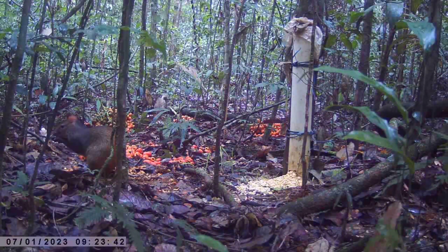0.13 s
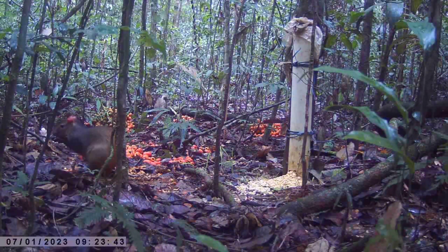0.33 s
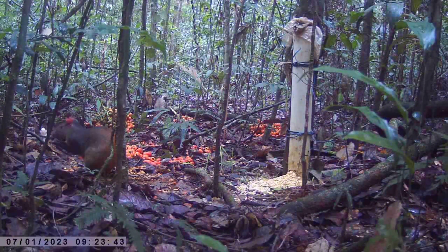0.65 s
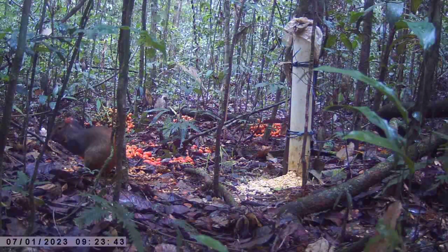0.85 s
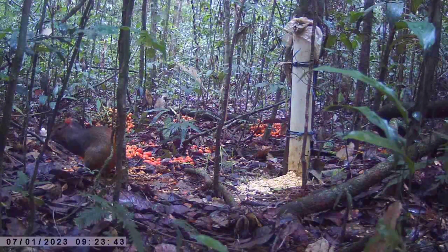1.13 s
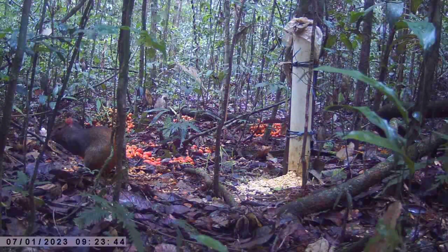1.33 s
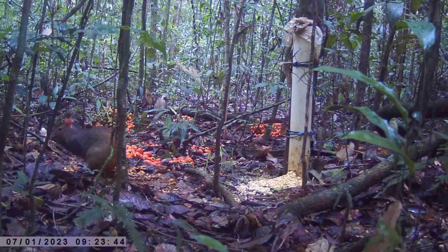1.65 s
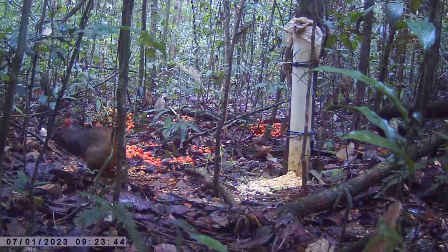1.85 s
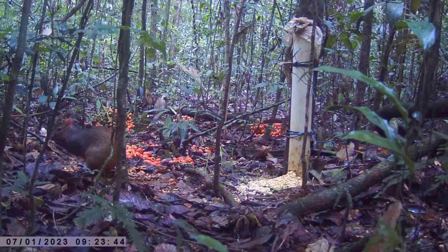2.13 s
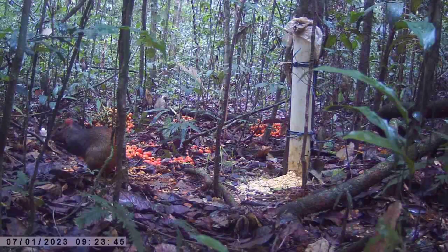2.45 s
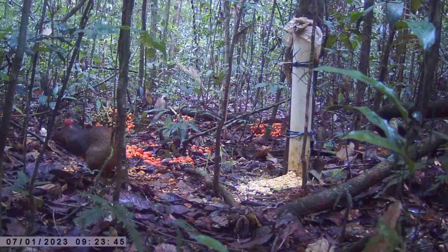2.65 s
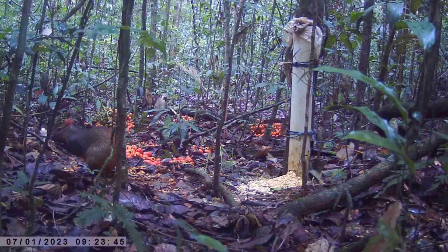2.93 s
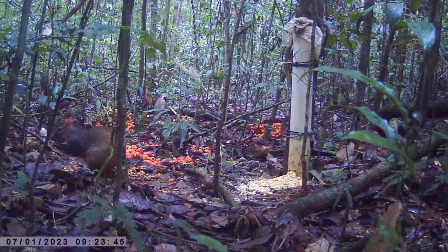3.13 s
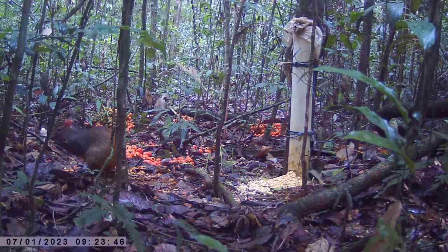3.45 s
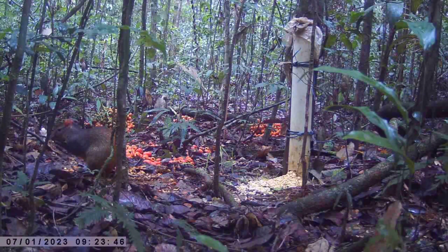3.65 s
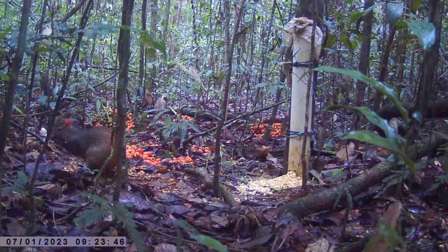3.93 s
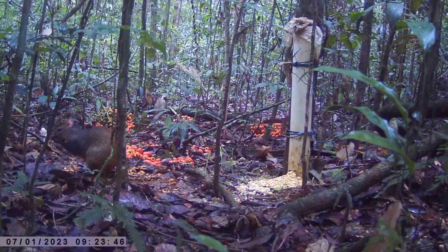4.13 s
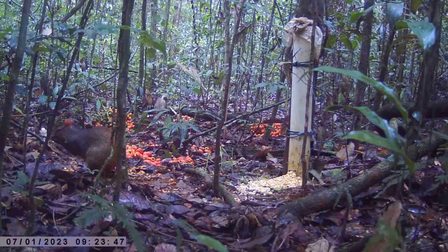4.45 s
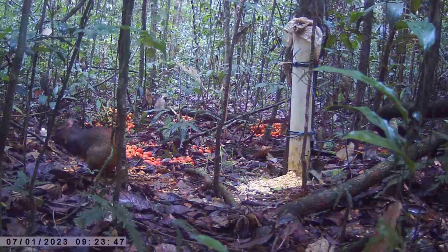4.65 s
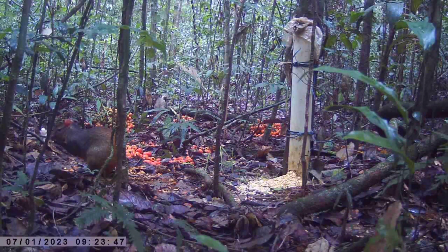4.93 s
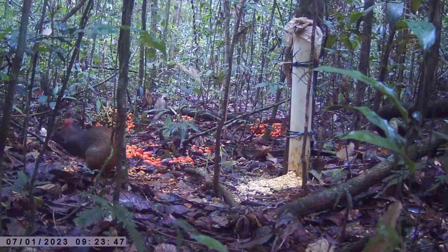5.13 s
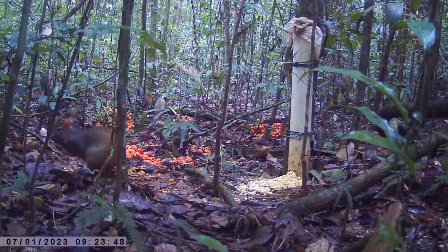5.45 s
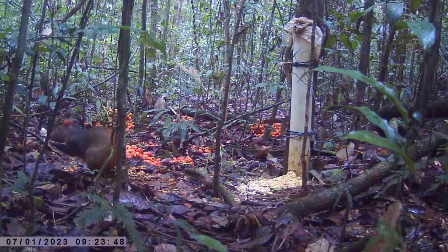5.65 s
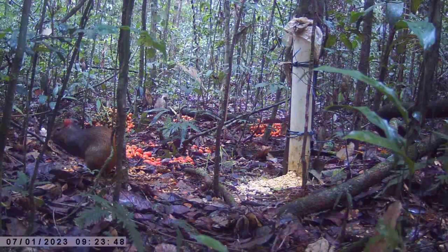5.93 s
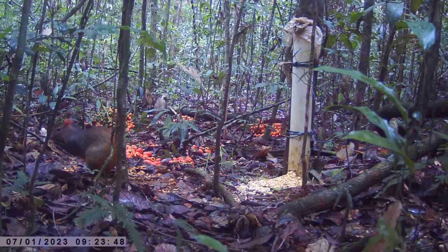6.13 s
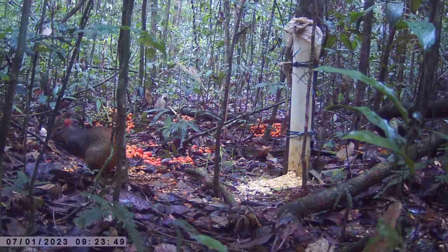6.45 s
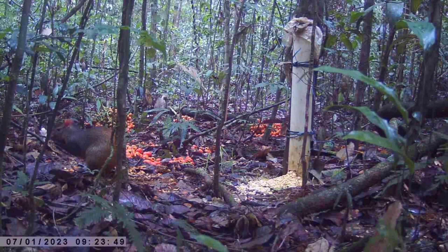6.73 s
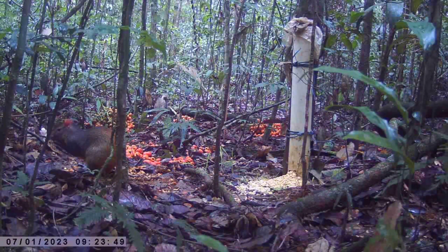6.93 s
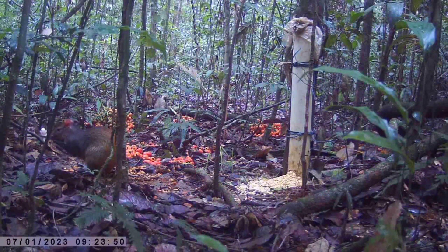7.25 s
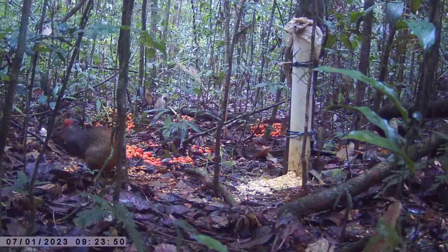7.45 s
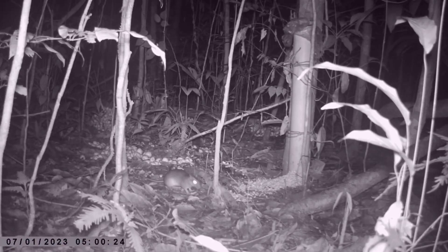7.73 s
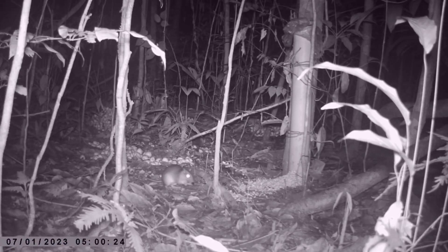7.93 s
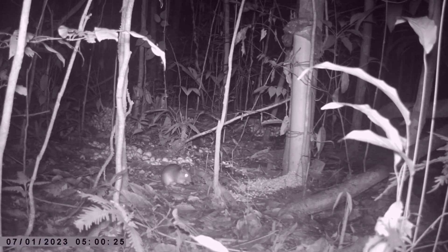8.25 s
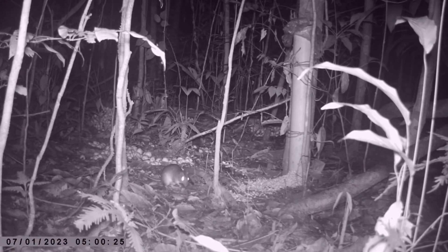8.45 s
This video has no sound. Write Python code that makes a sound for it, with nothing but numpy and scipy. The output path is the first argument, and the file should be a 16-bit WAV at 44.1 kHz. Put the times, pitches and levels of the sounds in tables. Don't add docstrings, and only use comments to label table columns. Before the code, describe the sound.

A near cricket chirps in quick six-stroke bursts over a high insect chorus, with echoing bird whistles and ticking drips, before a sudden cut to soft trilling.

```python
import sys
import numpy as np
from scipy import signal
from scipy.fft import rfft, irfft
from scipy.io import wavfile
from scipy.ndimage import uniform_filter1d

SR = 44100
rng = np.random.default_rng(int(sys.argv[2]) if len(sys.argv) > 2 else 0)


def voltage_ratio(decibels):
    exponent = np.asarray(decibels, float) / 20
    return 10 ** exponent


def materialize(psi):
    bounded = np.clip(np.atleast_2d(psi).T, -1, 1)
    quanta = np.round(bounded * 32767).astype(np.int16)
    wavfile.write(sys.argv[1], SR, quanta)


N = 379337
CHANGE_S = 7.6185

# t/s, low singers level/dB, middle singers level/dB, high singers level/dB
CHORUS_SWELL = [(0.0, -60, -47, -54), (0.1, -64, -83, -63), (0.25, -57.5, -53, -66), (0.5, -54, -64, -58.5),
                (0.68, -52, -51, -61), (0.87, -64, -63.5, -64), (1.15, -66, -57, -61),
                (1.46, -58, -56, -60), (2.1, -56, -54.5, -59.5), (2.6, -53.5, -55.5, -61.5),
                (3.18, -62.5, -57.5, -63), (3.9, -56.5, -55, -62), (4.55, -56.5, -54.5, -62.5),
                (4.87, -61, -57, -65), (5.73, -60.5, -57, -67.5), (5.9, -55.5, -56.5, -65.5),
                (6.7, -56.5, -56.5, -67), (7.0, -61, -57, -64)]


def in_time(rows):
    s, *columns = np.transpose(rows)
    return [np.interp(np.arange(N) / SR, s, c) for c in columns]


def rms_one(x):
    return x / np.sqrt(np.mean(x ** 2) + 1e-20)


def drift(rate):
    knots = rng.standard_normal(2000)
    return np.interp(np.arange(N) / SR * rate, np.arange(2000), knots)


def band(x, low_hz, high_hz, order=2):
    return signal.sosfilt(signal.butter(order, [low_hz, high_hz], "band", fs=SR, output="sos"), x)


def forest(x, t60, onset_s):
    t = np.arange(SR * 2) / SR
    response = rng.standard_normal(len(t)) * voltage_ratio(-60 * t / t60) * (1 - np.exp(-t / onset_s))
    return signal.fftconvolve(x, response / np.sqrt(np.sum(response ** 2)))[:N]


def near_cricket():
    # t/s of first stroke, first stroke level/dB
    chirps = [(0.0045, 0.5), (0.314, 0.5), (0.6235, 1), (0.933, -2.5), (1.2658, 0), (1.599, 0.5),
              (1.9298, 0.5), (2.239, 0.5), (2.548, 0), (2.858, -0.5), (3.167, 0.5), (3.4749, 0),
              (3.7845, -1), (4.094, -7), (4.4026, -5), (4.735, -2), (5.045, 1), (5.354, 1), (5.687, -2.5),
              (5.9979, -6), (6.331, 0), (6.64, -2), (6.949, -1.5), (7.258, 0.5), (7.5683, 0)]
    stroke_gaps_ms = [24.82, 23.77, 22.4, 23.96, 24.9]
    # t/ms from its peak, f/Hz, level/dB
    wing_stroke = [
        (-6.8, 7040, -40),
        (-5.4, 6960, -7.5),
        (-3.4, 6810, -6),
        (-1.2, 6600, -2),
        (.4, 6430, 0),
        (2.0, 6240, -4),
        (3.2, 6120, -13),
        (4.6, 6050, -40),
    ]
    direct_db, overtone_db, echo_db = -31, -28, -13
    ms, pitch, level = np.transpose(wing_stroke)
    t = np.arange(-8, 6, 1000 / SR)
    out = np.zeros(N + SR)
    for start, first_db in chirps:
        for k, lag in enumerate(np.cumsum([0] + stroke_gaps_ms)):
            late_ms, detune, loud_db, tilt = rng.standard_normal(4)
            phase = 2 * np.pi * np.cumsum(np.interp(t, ms, pitch) * (1 + 0.0031 * detune)) / SR
            level_db = np.interp(t, ms, level) + .6 * loud_db + .3 * tilt * t
            gain = voltage_ratio(level_db + first_db * (k == 0))
            overtone = voltage_ratio(overtone_db) * np.sqrt(gain) * np.sin(2 * phase)
            at = round((start + (lag + 0.45 * late_ms) / 1000) * SR)
            out[at:at + len(t)] += gain * (np.sin(phase) + overtone)
    direct = voltage_ratio(direct_db) * out[round(8 * SR / 1000):][:N]
    return direct + voltage_ratio(echo_db) * forest(direct, t60=0.11, onset_s=0.006)


def species(hz, fall_hz, spread_hz, per_s, lead_db, level_db, count=8):
    out = 0
    for k in range(count):
        pace, start = rng.standard_normal(2)
        rate = per_s * (1 + .06 * pace * (k > 0) + .02 * drift(9))
        cycle = (start + np.cumsum(rate) / SR) % 1
        stroke = np.clip(cycle / .6, 0, 1)
        pitch = hz + spread_hz * drift(per_s) + fall_hz * (.5 - stroke)
        gain = voltage_ratio(lead_db * (k == 0) + 1.5 * drift(5) + 1.8 * drift(per_s))
        out = out + gain * np.sin(np.pi * stroke) * np.sin(2 * np.pi * np.cumsum(pitch) / SR)
    return voltage_ratio(level_db) * rms_one(out + voltage_ratio(-3.5) * forest(out, t60=0.35, onset_s=0.0053))


def day_chorus(swell):
    # f/Hz, fall per stroke f/Hz, spread f/Hz, stroke rate f/Hz, lead singer level/dB, level/dB
    singers = [
        (5400, 460, 165, 68.8, 7, 2.37),
        (6805, 600, 300, 48, -2, 2.5),
        (7547, 350, 110, 124, 1, 0.7),
    ]
    return sum(voltage_ratio(db) * species(*row) for db, row in zip(swell, singers))


def dawn_trill():
    # t/s of first pulse top, number of pulses, peak level/dB
    runs = [(7.644, 1, -51), (7.725, 2, -51), (7.817, 1, -65), (7.854, 5, -51.5), (8.125, 1, -49),
            (8.176, 1, -50), (8.204, 1, -57), (8.44, 1, -69), (8.253, 4, -49), (8.491, 1, -55),
            (8.526, 1, -49), (8.572, 1, -51)]
    period_s, pulse_s, pitch_hz, bed_db = .0483, .034, 4607, -64
    tops = np.zeros(N)
    for s, pulses, peak_db in runs:
        count = round(pulses)
        at = np.round((s + period_s * np.arange(count)) * SR).astype(int)
        tops[at] = voltage_ratio(peak_db + 2.5 * rng.standard_normal(count))
    pulse_train = signal.fftconvolve(tops, np.hanning(round(pulse_s * SR)), "same")
    envelope = pulse_train + voltage_ratio(bed_db + 3.0 * drift(42))
    tone = envelope * np.sin(2 * np.pi * np.cumsum(pitch_hz + 18 * drift(40)) / SR)
    return voltage_ratio(-5.5) * tone + voltage_ratio(-13) * forest(tone, t60=.3, onset_s=.01)


def dawn_chorus():
    # f/Hz, fall per stroke f/Hz, spread f/Hz, stroke rate f/Hz, lead singer level/dB, level/dB
    singers = [
        (5330, 420, 170, 67, -2, -53),
        (6620, 350, 120, 99, 1.9, -58),
        (7330, 600, 260, 51, 1.1, -65),
        (6020, 44, 30, 30, 3, -70),
    ]
    return sum(species(*row, count=5) for row in singers)


def upstrokes():
    # t/s from start, share of its span/1, level/dB
    course = [
        (0, 0.007, -47),
        (.013, 0.076, 0.5),
        (.03, 0.325, 3.5),
        (.044, 0.629, 5.5),
        (0.063, .84, 4),
        (.084, 0.953, 1),
        (.125, 0.998, -40),
    ]
    # t/s, top f/Hz, level/dB, dulling per kHz level/dB
    whistles = [
        (1.2, 4400, -53, 5.0),
        (1.722, 4800, -59.5, 0),
        (1.782, 4450, -57, 5.0),
        (4.537, 4000, -70, 9.0),
        (5.128, 4000, -70, 10.0),
    ]
    from_hz = 1420
    rise_s, rise_share, rise_db = np.transpose(course)
    t = np.arange(0, rise_s[-1], 1 / SR)
    notes = []
    for s, top_hz, db, dull_db in whistles:
        pitch = from_hz + (top_hz - from_hz) * np.interp(t, rise_s, rise_share)
        dulling_db = dull_db * np.clip(pitch / 1000 - 2.3, 0, 3)
        notes.append((s, pitch, voltage_ratio(db + np.interp(t, rise_s, rise_db) - dulling_db)))
    return notes


def downstrokes():
    # t/s before the end, share of its span/1
    course = [(-.56, 1), (-.29, .885), (-.155, .74), (-.1, .565), (-.068, .38), (-.058, .25), (-.045, .075),
              (-.028, .015), (0, 0)]
    course_db = [-23, -6, -4, 1.5, 0, 0.5, -0.5, -4.5, -14.5]
    # end t/s, length t/s, floor f/Hz, top f/Hz, level/dB
    whistles = [
        (2.287, 0.25, 1647, 4834, -51.5),
        (2.766, .56, 1678, 5232, -54),
        (5.612, .2, 1650, 4800, -66),
    ]
    fade_in_s = .12
    fall_s, fall_share = np.transpose(course)
    notes = []
    for end, length, floor_hz, top_hz, db in whistles:
        t = np.arange(-length, 0, 1 / SR)
        fade = np.clip((t + length) / fade_in_s, 0, 1) ** 2
        pitch = floor_hz + (top_hz - floor_hz) * np.interp(t, fall_s, fall_share)
        notes.append((end - length, pitch, fade * voltage_ratio(db + np.interp(t, fall_s, course_db))))
    return notes


def glides():
    # t/s, length t/s, from f/Hz, to f/Hz, level/dB
    eased = [
        (0.378, 0.25, 1284, 980, -70),
        (1.313, 0.27, 1337, 1070, -69.5),
        (1.81, .4, 4540, 5260, -60),
        (1.882, 0.14, 4260, 4400, -79),
    ]
    notes = []
    for s, length, from_hz, to_hz, db in eased:
        done = np.arange(0, length, 1 / SR) / length
        pitch = to_hz + (from_hz - to_hz) * (1 - done) ** 2.2
        notes.append((s, pitch, voltage_ratio(db) * np.minimum(1, 8 * np.minimum(done, 1 - done))))
    return notes


def birds():
    far_below_db, far_screen = -62, 2.5
    direct, out, ruffle = np.zeros(N), np.zeros(N), drift(29.82)
    for s, pitch, gain in upstrokes() + downstrokes() + glides():
        at = round(s * SR) + np.arange(len(pitch))
        tone = gain * voltage_ratio(5.5 + 2.0 * ruffle[at]) * np.sin(2 * np.pi * np.cumsum(pitch) / SR)
        far = max(far_below_db - 20 * np.log10(gain.max()), 0)
        leaf_loss_db = 3.5 * np.clip(pitch / 1000 - 2.6, 0, 3)
        far_loss_db = far + far_screen * far * np.clip(pitch / 1000 - 2.2, 0, 3)
        direct[at] += tone * voltage_ratio(-leaf_loss_db - far_loss_db)
        out[at] += tone
    out = band(out, 1520, 9700, order=3)
    trunks = voltage_ratio(-2.5) * forest(out, t60=0.32, onset_s=0.0017)
    deep_forest = voltage_ratio(0.5) * forest(out, t60=1.22, onset_s=0.034)
    return voltage_ratio(-4.5 + 5.6 * drift(70)) * direct + trunks + deep_forest


def held_notes():
    # t/s of top, f/Hz, peak level/dB, length t/s
    swells = [(0.404, 1550, -62, 0.14), (0.544, 1540, -73, 0.055), (0.626, 1550, -70, 0.074),
              (0.738, 1557, -66, 0.11), (1.025, 1570, -79.5, 0.36), (2.264, 1660, -58, 0.083),
              (2.436, 1627, -52, 0.22), (2.563, 1630, -60, 0.12), (2.687, 1627, -72, 0.16),
              (2.794, 1710, -65.5, 0.16), (2.33, 1610, -70, 0.11), (2.95, 1640, -63, 0.12),
              (2.886, 1695, -58, 0.054), (2.993, 1676, -59, 0.21), (3.08, 1664, -67, 0.14),
              (3.35, 1700, -79, .2), (4.35, 1600, -80, 0.63), (5.802, 1650, -67, 0.13),
              (5.93, 1642, -75, 0.4), (7.708, 3850, -72, .16), (0.476, 1550, -70, 0.088),
              (0.824, 1570, -76, .08), (3.16, 1684, -71.5, 0.26), (5.7, 1660, -83, .15),
              (7.81, 3620, -78, .16)]
    t, out, flutter, waver = np.arange(N) / SR, np.zeros(N), drift(45), np.cumsum(5 * drift(13)) / SR
    for top, hz, db, length in swells:
        at = round((top - length / 2) * SR) + np.arange(round(length * SR))
        gain = np.hanning(len(at)) * voltage_ratio(db + 2.0 + 2.2 * flutter[at])
        out[at] += gain * np.sin(2 * np.pi * (hz * t[at] + waver[at]))
    return out + voltage_ratio(-11) * forest(out, t60=.5, onset_s=.01)


def ticks(s, db, hz, rise_ms, decay_ms, climb, shift_db):
    ms = np.arange(260) * 1000 / SR
    shape = (1 - np.exp(-ms / rise_ms)) ** 2 * np.exp(-ms / decay_ms)
    phase = 2 * np.pi * hz[:, None] * (ms + climb * (ms / 2 - decay_ms) * ms) / 1000
    lead = round(ms.searchsorted(2.2 * rise_ms))
    at = np.round(s * SR).astype(int)[:, None] + np.arange(len(ms)) - lead
    out = np.zeros(N)
    np.add.at(out, at, voltage_ratio(db + shift_db)[:, None] * shape / shape.max() * np.cos(phase))
    return out


def drips():
    # t/s, dull level/dB, bright level/dB, dull f/Hz, bright f/Hz
    leaf_drops = [(0.2524, -44.5, -51, 5080.0, 11190.0), (0.381, -70.0, -53.0, 4060.0, 9660.0),
                  (0.4432, -42, -36.5, 4460.0, 9700), (1.2992, -33.5, -45, 4800, 10800),
                  (1.3044, -53, -45, 5250, 9800), (1.7367, -36.0, -37, 4800, 10500),
                  (2.093, -39, -37.5, 4760, 10300), (2.3357, -30.5, -40, 4950.0, 10100),
                  (2.6883, -37, -45, 4450, 10000.0), (2.864, -39, -40.5, 5000, 10500),
                  (2.9534, -31.5, -37.5, 4630, 10500), (4.112, -42, -43.5, 4560.0, 10900),
                  (4.2689, -56, -54.0, 4990.0, 11240.0), (4.287, -44, -41, 4510.0, 10900),
                  (4.5171, -57, -53.0, 5120.0, 11010.0), (4.8347, -41, -47, 4670, 10620.0),
                  (5.1351, -45, -52, 5580.0, 10900.0), (5.4185, -37.5, -43, 4330.0, 10600),
                  (5.4565, -35, -39.0, 4600, 10100), (5.901, -33.5, -35, 4960, 10330),
                  (6.0882, -49.0, -56, 5140.0, 10870.0), (6.1751, -34, -38, 4970, 9680.0),
                  (6.375, -40.5, -46, 4550.0, 9870.0), (6.6892, -48.0, -52, 5820.0, 10470.0),
                  (6.706, -41, -47, 4900, 9840.0), (6.7266, -39, -37, 4730.0, 9900),
                  (6.8993, -40.5, -42, 4800, 10500), (7.4113, -46, -40, 4130.0, 10300),
                  (7.4193, -39, -42, 4800, 10100), (7.4341, -34.5, -32.5, 4340, 9900.0)]
    # t/s, dull level/dB, bright level/dB, dull f/Hz, bright f/Hz
    litter_drops = [(0.0456, -49.0, -61.5, 5060.0, 9300.0), (0.2064, -46.5, -60.0, 4580.0, 10610.0),
                    (0.2422, -30, -41, 4570, 10880.0), (0.249, -38, -46, 4400, 10860.0),
                    (0.4255, -38.5, -51, 4460, 10500), (1.0668, -36.5, -51, 4900, 11040.0),
                    (2.3294, -47, -50, 4880.0, 11010.0), (2.3534, -43.0, -53, 3960.0, 10850.0),
                    (2.681, -41.5, -45, 4810.0, 10160.0), (2.8837, -41.5, -57, 5670.0, 11380.0),
                    (3.1032, -49, -66.5, 4490.0, 10800), (3.7173, -39.5, -51, 4600, 10990.0),
                    (3.728, -37, -51.5, 4890.0, 10880.0), (3.9047, -36, -63, 5610.0, 10430.0),
                    (3.9273, -30, -40.5, 4570, 10300), (4.4467, -48, -66.0, 4300.0, 10040.0),
                    (4.4691, -44.5, -56.0, 4830.0, 11190.0), (4.6258, -38, -64.0, 5530.0, 10360.0),
                    (4.643, -42.5, -52, 4920.0, 10170.0), (4.825, -45.0, -62, 4800.0, 10310.0),
                    (5.1942, -37.0, -45, 4570, 11340.0), (5.199, -40, -48, 4590.0, 10000),
                    (5.2161, -41.0, -49.5, 4350.0, 11300.0), (5.2268, -28.0, -41.5, 4800, 10300),
                    (5.3871, -38.5, -51, 4580.0, 9770.0), (6.104, -42.0, -56.5, 5000, 11090.0),
                    (7.2037, -42.5, -59, 4610.0, 10330.0), (7.218, -35, -51, 4630, 10280.0),
                    (7.2469, -32.5, -47, 4670, 10100), (7.4001, -41.5, -67.0, 5040, 12110.0),
                    (7.43, -41.0, -68, 4870.0, 9180.0)]
    # later t/s, dull level/dB, bright level/dB
    droplets = [
        (.007, -34, -22),
        (.012, -20, -18),
    ]
    # rise t/ms, decay t/ms, pitch climb per ms, level/dB
    bright_tick = (.17, .5, .02, 1.0)
    dull_tick = (.22, .75, .05, 0.5)
    leaf, litter = np.array(leaf_drops), np.array(litter_drops)
    scatter = [0.0025, 4, 4, 200, 500]   # s, dB, dB, Hz, Hz
    spray = [leaf + [*droplet, 0, 0] + scatter * rng.standard_normal(leaf.shape) for droplet in droplets]
    s, dull_db, bright_db, dull_hz, bright_hz = np.vstack([leaf, litter] + spray).T
    high = ticks(s, bright_db, bright_hz, *bright_tick)
    low = ticks(s, dull_db, dull_hz, *dull_tick)
    snap = np.zeros(N)
    snap[np.round((s - .0003) * SR).astype(int)] = voltage_ratio(dull_db - 13)
    low = band(low, 2100, 11000) + band(snap + 1e-18, 1000, 8500)
    splash = forest(voltage_ratio(-1.5) * high + voltage_ratio(-11.5) * low, t60=0.053, onset_s=0.0014)
    return high + low + splash + voltage_ratio(-17.0) * forest(high + low, t60=0.22, onset_s=0.01)


def ring(clicks, modes):
    out = 0
    for hz, level_db, t60 in modes:
        r, w = voltage_ratio(-60 / (t60 * SR)), 2 * np.pi * hz / SR
        mode = signal.lfilter([0, np.sin(w)], [1, -2 * r * np.cos(w), r * r], clicks + 1e-18)
        out = out + voltage_ratio(level_db) * mode
    return out


def footfalls():
    # t/s, level/dB
    steps = [
        (8.152, -42),
        (8.2, -50),
    ]
    # f/Hz, level/dB, t60 t/s
    leaf_modes = [
        (1960, 4, .012),
        (2700, 6, .012),
        (3600, 1, .008),
    ]
    pats = np.zeros(N)
    for s, db in steps:
        pats[round(s * SR)] = voltage_ratio(db - 13)
    return forest(ring(pats, leaf_modes), t60=0.028, onset_s=0.0017)


def canopy(low_db):
    level_db = -64 + 0.22 * (low_db - low_db.mean()) + 0.37 * drift(8.9)
    return voltage_ratio(level_db) * rms_one(band(rng.standard_normal(N), 4390, 7100, order=3))


def thin_buzzer():
    # t/s, length t/s
    buzzes = [(.4, 0.085), (.66, 0.072), (0.938, 0.053), (1.189, 0.07), (1.493, 0.045), (1.666, 0.065),
              (2.397, 0.083), (2.66, 0.11), (3.19, 0.12), (3.677, 0.12), (4.19, 0.12), (4.667, 0.12),
              (5.247, 0.076), (5.68, .12), (6.19, 0.15), (6.677, .1), (7.19, 0.13), (8.12, 0.18)]
    t = np.arange(N) / SR
    on = uniform_filter1d(sum(1. * (t > s) * (t < s + length) for s, length in buzzes), size=400)
    return voltage_ratio(-73 + 3.8 * drift(30)) * on * np.sin(2 * np.pi * 11132 * t)


def hiss():
    # f/Hz, level/dB per Hz
    spectrum = [(12, 2.5), (30, 1.5), (60, -5), (125, -17), (300, -23), (1000, -27.5), (2500, -31),
                (4500, -31), (8500, -34.5), (15500, -39.5)]
    hz, level = np.transpose(spectrum)
    bins = np.arange(N // 2 + 1) * SR / N + 1
    colour = voltage_ratio(np.interp(np.log(bins), np.log(hz), level))
    return voltage_ratio(-57) * rms_one(irfft(rfft(rng.standard_normal(N)) * colour, N))


def floor_gain(share):
    # t/s, level/dB
    gain_slips = [(.19, -2.5), (.88, -3.5), (1.1, 1.5), (3.42, -2), (4.0, -1.5), (4.921, -3.5),
                  (5.29, -1.5), (5.57, -3.5), (5.72, 0), (5.85, -3), (6.42, 1), (7.16, -3), (7.38, -1.5),
                  (7.52, -4.5)]
    slip_s = 0.11
    low, t = in_time(CHORUS_SWELL)[0], np.arange(N) / SR
    slips = sum(db * np.clip(1 - 2 * np.abs(t - s) / slip_s, 0, 1) for s, db in gain_slips)
    return voltage_ratio(share * (0.074 * (low - low.mean()) + slips))


def scene():
    swell = in_time(CHORUS_SWELL)
    day = near_cricket() + day_chorus(swell) + canopy(swell[0]) + birds()
    dawn = dawn_chorus() + dawn_trill() + footfalls()
    mono = np.where(np.arange(N) / SR < CHANGE_S, day, dawn)
    mono = mono + held_notes() + thin_buzzer() + drips() + floor_gain(share=1.0) * hiss()
    return np.array([mono, mono])


def low_pass(x):
    return signal.sosfilt(signal.butter(12, 15720, fs=SR, output="sos"), x)


def record(dry):
    # t/s, level/dB
    settling = [
        (7.62, 5.5),
        (7.8, 5.5),
        (7.95, 2),
        (8.15, -2.2),
        (8.6, 0.5),
    ]
    offset_rise_s, offset_fall_s, rumble_s = 0.024, 0.11, 0.33
    since = np.clip(np.arange(N) / SR - CHANGE_S, 0, None)
    gain = np.where(since > 0, voltage_ratio(in_time(settling)[0]), 1)
    offset = -0.03 * (np.exp(-since / offset_fall_s) - np.exp(-since / offset_rise_s))
    step = 0.012 * (since > 0) * np.exp(-since / 0.013)
    shake = since / rumble_s * np.exp(1 - since / rumble_s)
    rumble = voltage_ratio(-65) * shake * rms_one(band(rng.standard_normal(N), 18, 76))
    converter = voltage_ratio(-65) * floor_gain(share=1) * rng.standard_normal(N)
    x = dry * gain + offset + step + rumble + converter
    x = x * voltage_ratio(1.0 * drift(17))
    x = signal.sosfilt(signal.cheby2(18, 40, 15600, fs=SR, output="sos"), x)
    return low_pass(x)


dry = scene()
out = record(dry)
materialize(out)
```